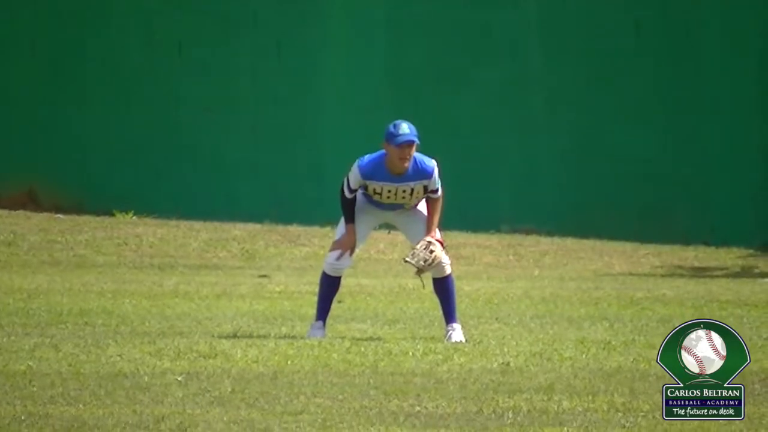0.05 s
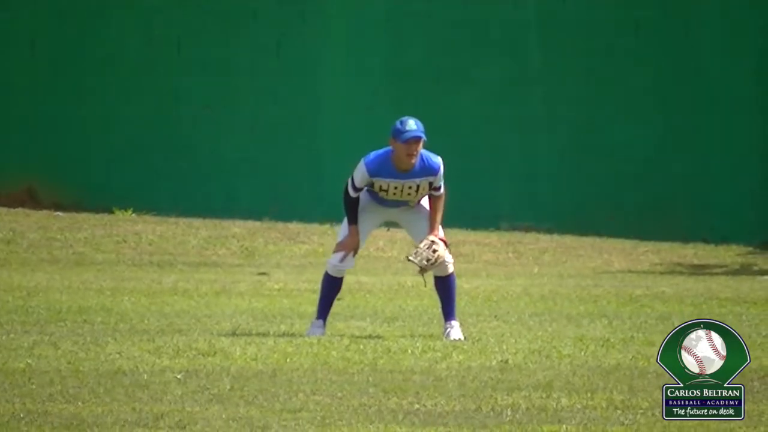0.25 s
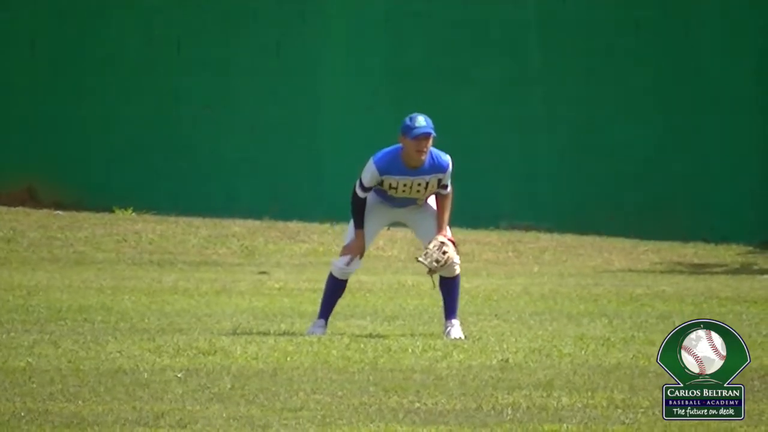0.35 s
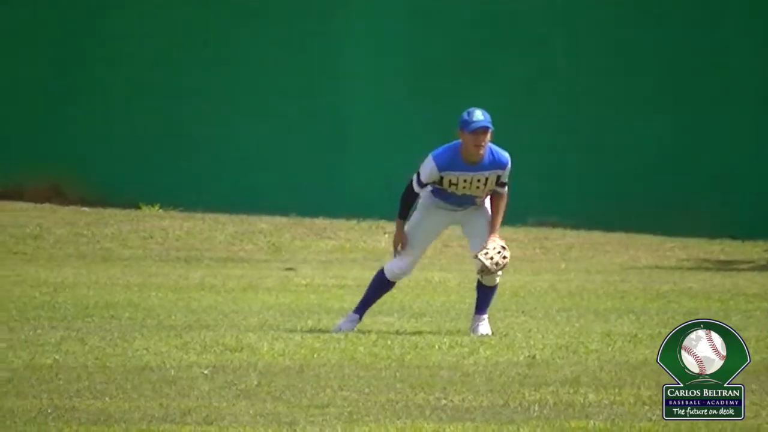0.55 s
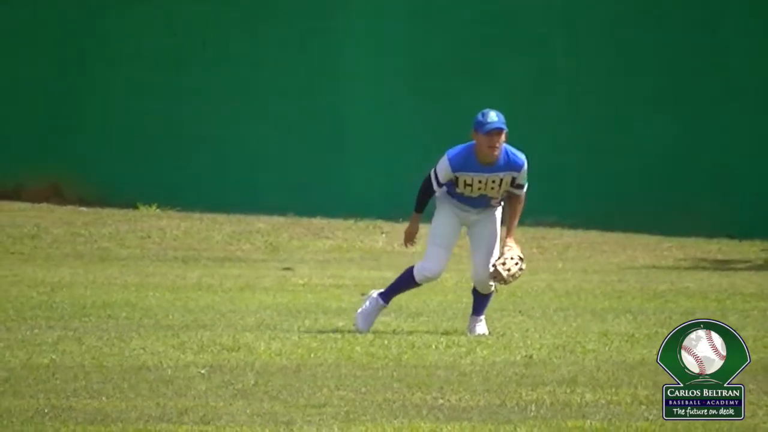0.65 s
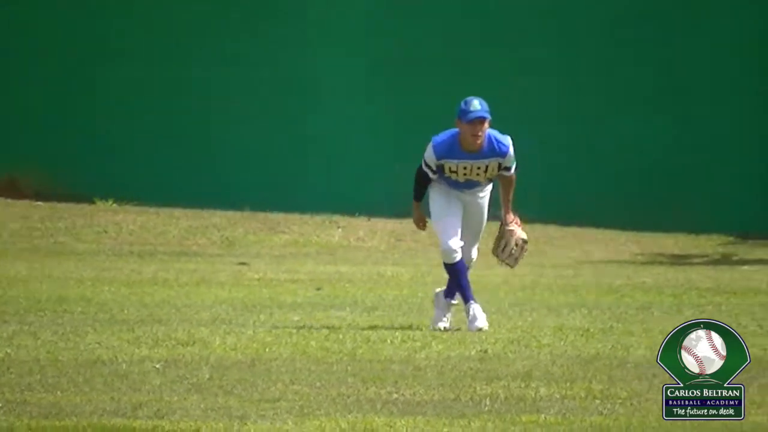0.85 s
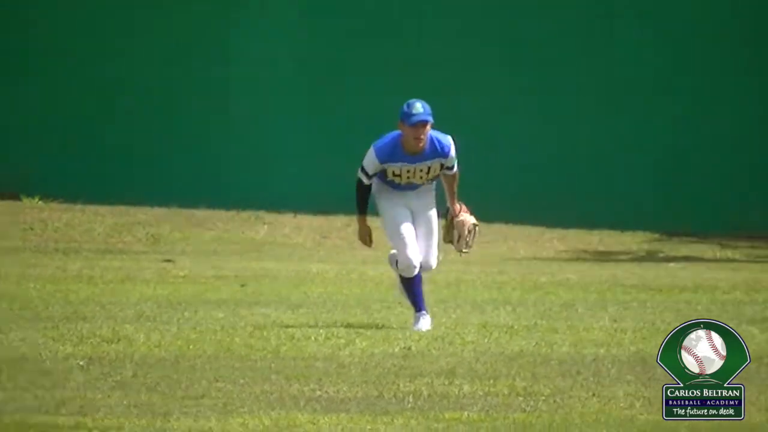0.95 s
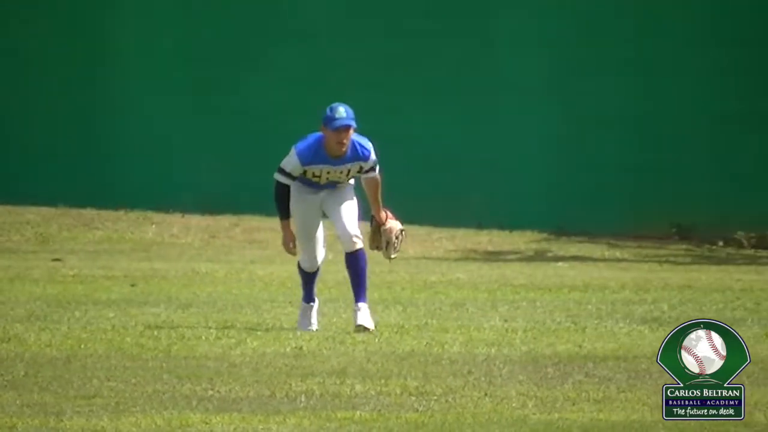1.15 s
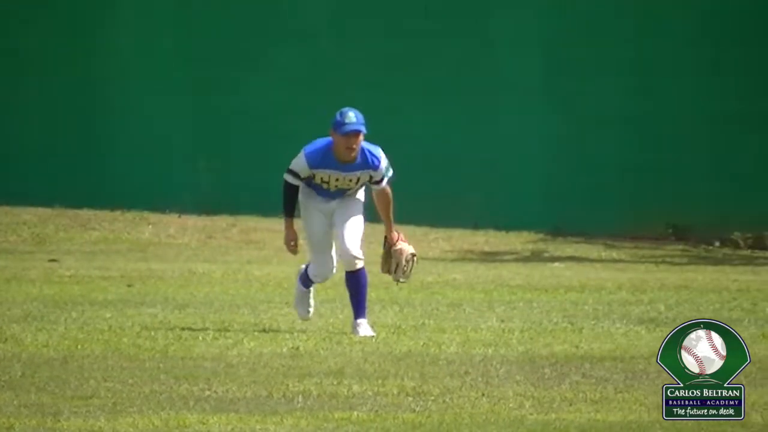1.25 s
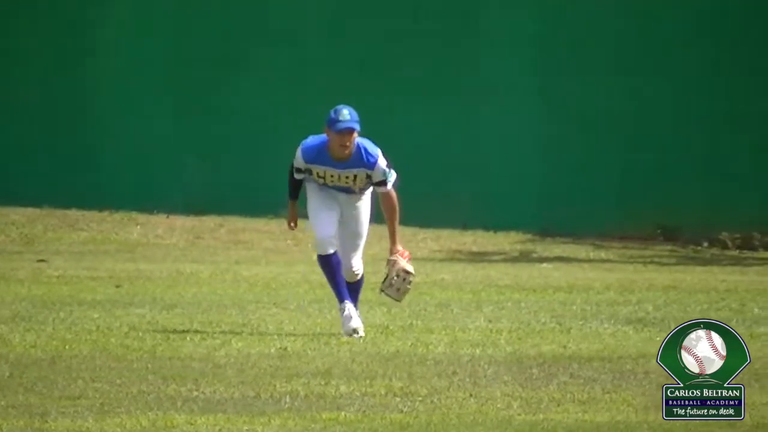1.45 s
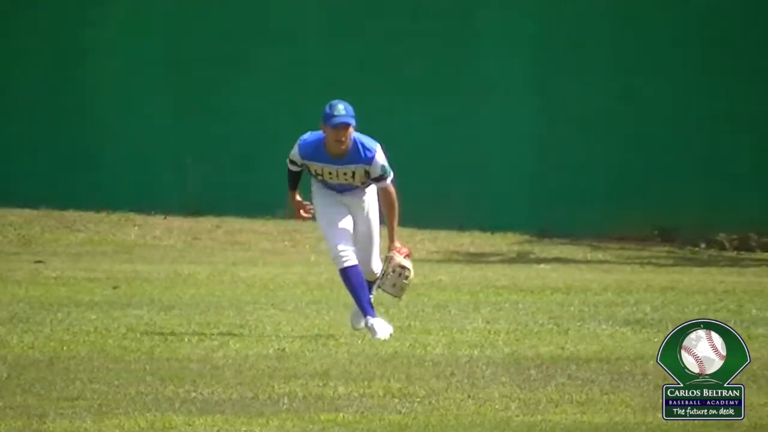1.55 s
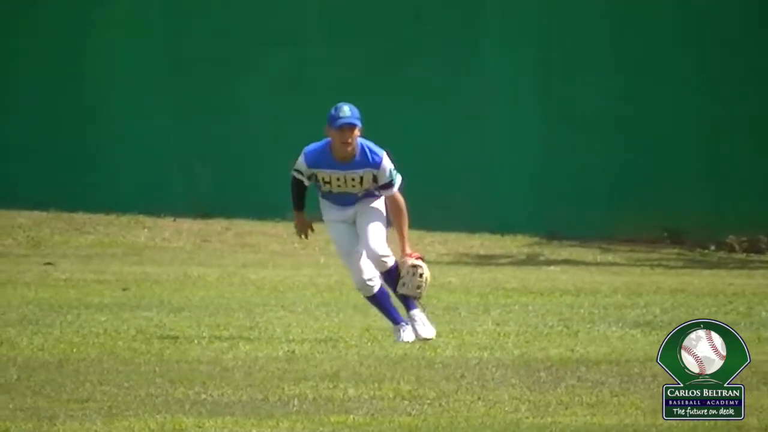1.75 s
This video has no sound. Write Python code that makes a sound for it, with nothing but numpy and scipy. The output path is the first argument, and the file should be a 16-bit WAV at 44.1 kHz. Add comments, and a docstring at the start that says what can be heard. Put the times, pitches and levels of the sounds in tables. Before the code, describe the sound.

On an open grass field, a bat strikes a ball with a hard, brief crack. Slap echoes and a small hollow knock trail it, then feet softly brush grass and a bird chirps; the microphone hisses faintly.

```python
"""Distant town noise, with the microphone's own hiss in the treble, and a faint hum lie over an open grass field.
Then a bat cracks a ball: short pushes ring the bat's modes and squeezed air snaps; delayed, smeared copies
return from a near wall, then from fences and stands further off, and a hollow knock sounds among the late ones.
Feet brush the grass twice as bursts of tiny flicks, and a bird's gliding tone whistles up and down.
Town noise and hiss are one shaped noise that swells and flickers; the hum is a few wavering tones."""
import sys
import numpy as np
from scipy import signal
from scipy.fft import rfft, irfft
from scipy.io import wavfile
from scipy.ndimage import uniform_filter1d

SR = 44100
rng = np.random.default_rng(int(sys.argv[2]) if len(sys.argv) > 2 else 0)


def to_wav(sig):
    """Store sig (one row per channel, or 1-D mono) as 16-bit WAV at the path in sys.argv[1].

    Samples outside -1..1 are clipped; the rate is SR.
    """
    pcm = np.clip(np.atleast_2d(sig), -1, 1) * 32767
    pcm = np.round(pcm).astype(np.int16)
    wavfile.write(sys.argv[1], SR, pcm.T)  # frames by channels


def to_linear_factor(level_db):
    """Convert decibel levels (scalar or array-like) to linear amplitude factors."""
    exponent = np.asarray(level_db, float) / 20
    return 10 ** exponent


N = 79380  # samples, 1.8 s
CRACK_PAN_DB = 1.0  # left over right, for the crack and what it sets off


def unit_level(x):
    """Scale a signal to an rms of 1."""
    return x / np.sqrt(np.mean(x ** 2))


def band(x, low_hz, top_hz):
    """Gentle band-pass, kept at least a factor of 1.2 wide."""
    edges_hz = [low_hz, max(top_hz, 1.2 * low_hz)]
    return signal.sosfilt(signal.butter(2, edges_hz, "bandpass", fs=SR, output="sos"), x)


def colour(x, table):
    """Shape a spectrum by (Hz, dB) points, straight lines on a log frequency axis."""
    hz, db = np.array(table).T
    f = np.maximum(np.arange(len(x) // 2 + 1) * SR / len(x), 1)
    gain = to_linear_factor(np.interp(np.log(f), np.log(hz), db))
    return irfft(rfft(x) * gain, len(x))


def walk(rate):
    """Slow smooth chance of spread 1, with `rate` fresh values a second."""
    hold = int(SR / rate)
    steps = np.repeat(rng.standard_normal(N // hold + 1), hold)
    smooth = uniform_filter1d(uniform_filter1d(steps, hold), hold)[:N]
    return smooth / np.std(smooth)


def pair(mid, side, pan_db=0.0):
    """Left and right from middle and side; pan_db is left over right."""
    return np.array([(mid + side) * to_linear_factor(pan_db / 2), (mid - side) * to_linear_factor(-pan_db / 2)])


def over(x, response):
    """Convolve a sound with a response, cut to the scene's length."""
    return signal.fftconvolve(x, response)[:N]


def crack():
    """Short pushes of the ball ring the bat's modes; the air squeezed out between ball and bat snaps."""
    # Each row: mode frequency in Hz, relative level in dB, time to fall 60 dB in s.
    bat_modes = [(433, -38.5, 0.03), (932, -12.5, 0.014), (1394, -4, 0.012), (2000, -6.5, 0.013),
                 (2400, -2.5, 0.01), (2933, 1, 0.0059), (3123, -4.5, 0.0083), (3736, -17.5, 0.0085),
                 (4530, -29, 0.011), (5290, -22.5, 0.0059)]
    # Ball squeezing on the bat, first touch and full blow. Each row: start in s, relative level in dB.
    pushes = [(.2006, -8), (.2012, 5.5)]
    push_s = 0.0002
    snap_s, ground_late_s = 0.2014, 0.000342
    snap_db = -17  # snap peak against ring peak
    peak_db = -0.3  # before panning
    t = np.arange(N) / SR

    force = 0
    for start, db in pushes:
        force = force + to_linear_factor(db) * np.sin(np.pi * np.clip((t - start) / push_s, 0, 1)) ** 2

    u = t[:SR // 10]
    bat = 0
    for k, (hz, db, t60) in enumerate(bat_modes):
        # neighbouring modes swing in opposite senses at the struck spot
        bat = bat + (-1) ** k * to_linear_factor(db) * np.sin(2 * np.pi * hz * u) * 1000 ** (-u / t60)
    ring = band(over(force, bat), 195, 9900)

    direct_tick = np.sinc((t - snap_s) * SR)
    ground_tick = np.sinc((t - snap_s - ground_late_s) * SR)
    snap = band(direct_tick - ground_tick, 4120, 9700)  # the return off the ground is inverted

    both = ring / abs(ring).max() + to_linear_factor(snap_db) * snap / abs(snap).max()
    return -to_linear_factor(peak_db) * both / abs(both).max()


def returns(dry):
    """Each surface answers with a rough, fading smear, flat ones with a clean edge; the ground scatters a wash."""
    # Echoes of the crack. Each row: delay in s, level in dB before filtering, smear in s,
    # dull above this Hz, thin below this Hz.
    echoes = [(.0424, -29, .0005, 4500, 1500), (.0443, -19.5, .0002, 8500, 600),
              (.0461, -22, .0002, 8500, 1300), (.048, -26, .007, 3200, 750), (.061, -38, .002, 9000, 2500),
              (.112, -37, .003, 3500, 1900), (.1347, -22, .006, 2800, 650), (.136, -38, .002, 6000, 3000),
              (.1481, -24.5, .0005, 6500, 900), (.1505, -25, .003, 4200, 700),
              (.168, -25.5, .007, 1800, 650), (.186, -30, .02, 2200, 600), (.2143, -33, .0006, 9000, 1800),
              (.2165, -35, .003, 6000, 1500), (.224, -32, .03, 2800, 800), (.5893, -33, .0003, 3200, 750),
              (.591, -34, .004, 1900, 700), (.6155, -27, .0003, 1900, 1250), (.628, -33, .008, 1800, 1100),
              (.81, -33, .0003, 3200, 1900), (.8272, -26, .0002, 2600, 1250),
              (.8416, -28.5, .0002, 2600, 1250)]
    # Scattered return from the whole ground. Each row: delay in s, energy per 10 ms in dB before colouring.
    scatter = [(0, -18.5), (0.018, -47), (.06, -46), (.11, -43), (.15, -35), (.2, -35.5), (.25, -41),
               (.33, -48.5), (.5, -73), (.9, -64)]
    # The bat as heard by surfaces in line with the camera. Each row: frequency in Hz, gain in dB.
    ahead_colour = [(300, 4), (620, 9), (950, 10.5), (1400, 0.5), (2400, 2), (3700, 10), (4700, 6),
                    (7500, 8.5), (10000, 11), (13000, -12)]
    # The bat heard from its other sides. Each row: frequency in Hz, gain in dB.
    aside_colour = [(300, -3), (620, 24), (900, 10.5), (1400, -0.5), (2000, 0.5), (3000, 0), (3700, 13),
                    (4500, 12), (5800, 16), (7500, 3), (10000, -1), (13000, -12)]
    near_s = 0.1  # surfaces that answer sooner stand in line with the camera
    sharp_s = 0.00087  # smears shorter than this keep much of a clean first edge
    echo_side_db, scatter_side_db = -19, -15
    t, u = np.arange(N) / SR, np.arange(4096) / SR

    walls = np.zeros((2, N))  # middle and side
    for late, db, smear, dull_hz, thin_hz in echoes:
        fading = rng.standard_normal((2, 4096)) * np.exp(-u / max(smear, 1e-5))
        rough = band(band(fading, thin_hz, dull_hz), thin_hz, dull_hz)
        clean = band(band(1.0 * (u == 0), thin_hz, dull_hz), thin_hz, dull_hz)
        # smear and clean edge carry the same energy before they are mixed
        rough *= np.sqrt(np.sum(clean ** 2) / np.sum(rough ** 2, axis=1, keepdims=True))
        edge = np.exp(-smear / sharp_s)
        rough[0] = (1 - edge) * rough[0] + edge * clean
        k = int(late * SR)
        walls[:, k:k + 4096] += to_linear_factor(db) * rough

    late, db = np.array(scatter).T
    envelope = to_linear_factor(np.interp(t, late, db, right=-120)) / np.sqrt(SR / 100)
    wash = rng.standard_normal((2, N)) * envelope

    ahead, aside = colour(dry, ahead_colour), colour(dry, aside_colour)

    def answer(response):
        """Early surfaces hear the bat from ahead, later ones from aside."""
        return over(ahead, response * (t < near_s)) + over(aside, response * (t >= near_s))

    mid = answer(walls[0] + wash[0])
    side = answer(to_linear_factor(echo_side_db) * walls[1] + to_linear_factor(scatter_side_db) * wash[1])
    return pair(mid, side, CRACK_PAN_DB)


def panel():
    """A hollow knock, perhaps a fence panel set ringing: two dull modes swell quickly and die."""
    # Each row: mode frequency in Hz, level in dB before rise and decay, time to fall 60 dB in s.
    panel_modes = [(585, -36, 0.027), (1234, -31.5, 0.038)]
    start_s, rise_s = 0.4197, 0.001
    u = np.maximum(np.arange(N) / SR - start_s, 0)
    ring = 0
    for hz, db, t60 in panel_modes:
        ring = ring + to_linear_factor(db) * np.sin(2 * np.pi * hz * u) * 1000 ** (-u / t60)
    return pair(ring * (1 - np.exp(-u / rise_s)), 0, CRACK_PAN_DB)


def feet():
    """Many blades of grass flick past a shoe: random ticks, coloured, swelling and falling with each brush."""
    # Each row: time in s, rms level in dB at full swell, rise in s, fall in s.
    brushes = [(0.905, -50.5, 0.0092, 0.049), (1.428, -52.5, 0.0082, 0.07)]
    # Spectrum of the flicks. Each row: frequency in Hz, relative level in dB.
    grass_colour = [(400, -19), (1000, 3.5), (2000, 10.5), (3000, 3), (4600, 2.5), (6000, -14.5),
                    (9000, -36)]
    blades_per_s, blade_spread_db = 12000, 1
    hold_s = 0.04  # full level lasts this long before the fall
    t = np.arange(N) / SR

    def blades():
        hits = rng.random(N) < blades_per_s / SR
        strength = rng.standard_normal(N) * to_linear_factor(blade_spread_db * rng.exponential(size=N))
        return unit_level(colour(hits * strength, grass_colour))

    shape = 0
    for start, db, rise, fall in brushes:
        rising = np.exp(-((t - start) / rise) ** 2)
        falling = np.exp(-np.maximum(t - start - hold_s, 0) / fall)
        shape = shape + to_linear_factor(db) * np.where(t < start, rising, falling)
    return pair(shape * blades(), shape * to_linear_factor(-17.5) * blades(), 0.47)


def bird():
    """One gliding whistle, its slap from a wall and a thin ring in the trees."""
    # Each row: time in s, pitch in Hz, rms level in dB before panning.
    whistle = [(1.546, 3050, -66), (1.558, 3476, -46), (1.568, 4150, -55), (1.578, 4750, -46.5),
               (1.585, 5020, -53), (1.589, 5050, -62), (1.596, 4800, -44), (1.601, 4400, -52),
               (1.605, 4180, -47.5), (1.612, 3980, -51), (1.622, 3700, -45.5), (1.63, 3440, -42.5),
               (1.634, 3150, -54), (1.643, 2780, -53), (1.648, 2650, -72)]
    slap_s, slap_db = 0.012, -13
    trees_db, trees_t60_s, trees_rise_s = -5.5, 0.55, 0.025
    t = np.arange(N) / SR

    s, hz, db = np.array(whistle).T
    loudness = np.sqrt(2) * to_linear_factor(np.interp(t, s, db, left=-120, right=-120))
    phase = 2 * np.pi * np.cumsum(np.interp(t, s, hz)) / SR
    tone = loudness * np.sin(phase)
    slapped = tone + to_linear_factor(slap_db) * np.roll(tone, int(slap_s * SR))

    u = t[:SR // 2]
    fade = 1000 ** (-u / trees_t60_s) * (1 - np.exp(-u / trees_rise_s))
    trees = rng.standard_normal((2, SR // 2)) * fade
    trees *= to_linear_factor(trees_db) / np.sqrt(np.sum(trees[0] ** 2))
    return pair(slapped + over(tone, trees[0]), to_linear_factor(-21) * over(tone, trees[1]), 4.5)


def town_and_microphone():
    """Distant town noise, microphone hiss in its treble: octaves swell together, flicker alone; a hum wavers."""
    # Town noise, and above about 6 kHz the microphone's hiss. Each row: frequency in Hz, relative level in dB per Hz.
    noise_colour = [(15, -71), (25, -38), (108, -21.5), (131, -12), (163, -14.5), (258, -12), (304, -10),
                    (338, -7.5), (495, -5), (537, -5.5), (851, -1.5), (1280, -4.5), (2260, -10.5),
                    (2730, -13), (9030, -28.5), (15100, -32.5), (16400, -57)]
    # Width of the noise. Each row: frequency in Hz, side against middle in dB.
    side_colour = [(60, -8), (110, -18), (200, -11), (380, -10), (700, -13.5), (1290, -14.5), (2380, -11),
                   (4400, -11), (8120, -13.5), (15000, -20)]
    # Balance of noise and hum. Each row: frequency in Hz, left over right in dB.
    left_over_right = [(60, -8), (110, 2), (200, 1.5), (380, 1.5), (700, 1.5), (1290, 1.5), (2380, 1),
                       (4400, -0.5), (8120, -0.5), (15000, 3)]
    # Far machine. Each row: tone in Hz, rms level in dB before waver and balance.
    hum_tones = [(140, -78.5), (223.5, -78), (252, -78), (335, -72.5), (419, -77), (503, -71)]
    noise_db = -52  # rms of the middle before the balance
    swell_db, flicker_db, hum_waver_db = 0.4, 0.8, 1.5  # rms of the level changes
    t, swell = np.arange(N) / SR, walk(3.9)

    noise = 0  # middle and side
    for hz in 31.25 * 2.0 ** np.arange(10):
        edges_hz = [hz / np.sqrt(2), min(hz * np.sqrt(2), 0.49 * SR)]
        octave = signal.butter(2, edges_hz, "bandpass", fs=SR, output="sos")
        gain = to_linear_factor(swell_db * swell + flicker_db * walk(9.03))
        noise = noise + signal.sosfilt(octave, rng.standard_normal((2, N))) * gain
    mid = colour(noise[0], noise_colour)
    side = colour(colour(noise[1], noise_colour), side_colour)
    left, right = to_linear_factor(noise_db) / np.std(mid) * pair(mid, side)

    hum = 0
    for hz, db in hum_tones:
        loudness = np.sqrt(2) * to_linear_factor(db + hum_waver_db * walk(3.34))
        hum = hum + loudness * np.sin(2 * np.pi * (hz * t + rng.random()))

    # half of the balance goes to each channel
    left_tilt = [(hz, 0.5 * db) for hz, db in left_over_right]
    right_tilt = [(hz, -0.5 * db) for hz, db in left_over_right]
    return np.array([colour(left + hum, left_tilt), colour(right + hum, right_tilt)])


def scene():
    """Crack, its returns, panel, feet, bird, and the town with the microphone's hiss together."""
    dry = crack()
    # the treble of the crack arrives a little off centre, two samples late in the side
    off_centre = to_linear_factor(-16) * np.roll(band(dry, 6000, 12000), 2)
    direct = pair(dry, off_centre, CRACK_PAN_DB)
    return direct + returns(dry) + panel() + feet() + bird() + town_and_microphone()


def roll_off(x):
    """The treble ends steeply here."""
    return signal.sosfilt(signal.butter(12, 16550, fs=SR, output="sos"), x)


def record(dry):
    """The camera cuts the top of the spectrum with a steep low-pass at 15900 Hz."""
    low_pass = signal.ellip(8, 0.2, 70, 15900, fs=SR, output="sos")
    mix = signal.sosfilt(low_pass, dry)
    return roll_off(mix)


dry = scene()
out = record(dry)
to_wav(out)
```